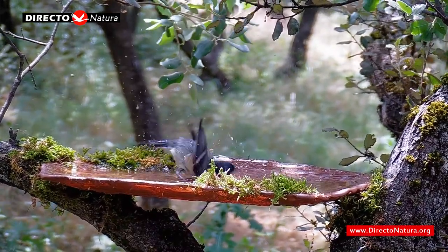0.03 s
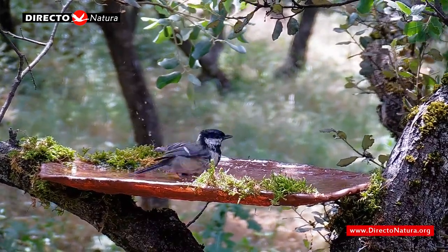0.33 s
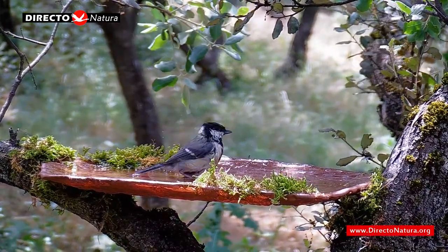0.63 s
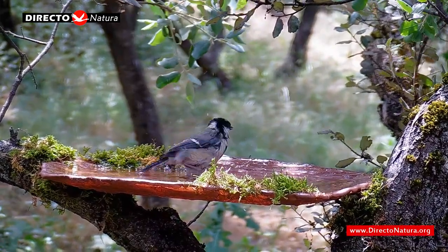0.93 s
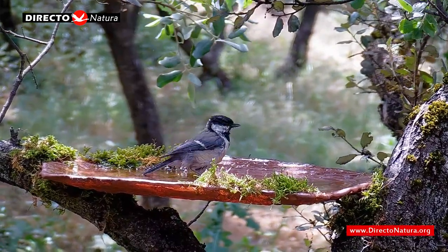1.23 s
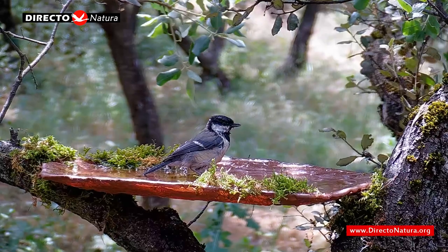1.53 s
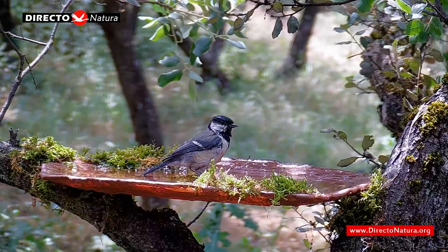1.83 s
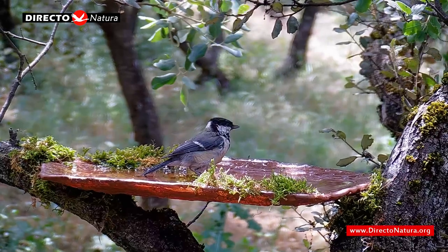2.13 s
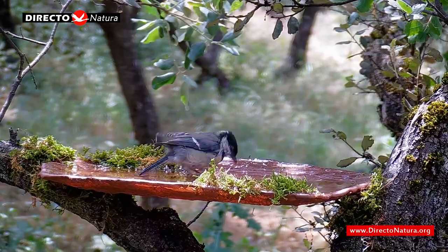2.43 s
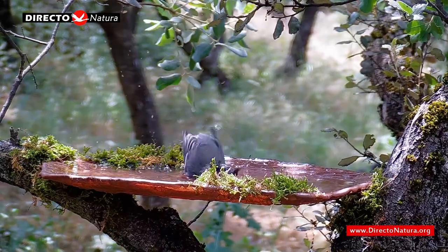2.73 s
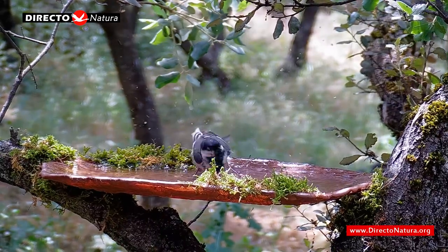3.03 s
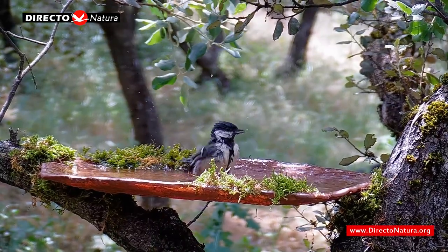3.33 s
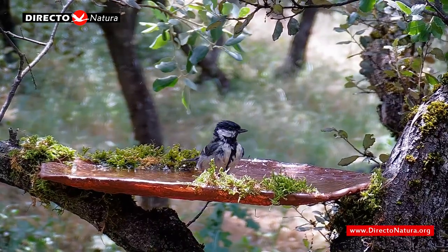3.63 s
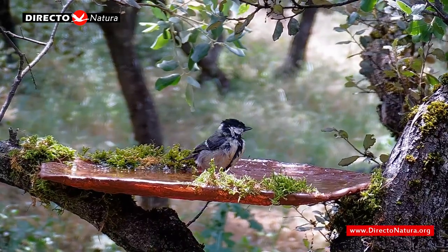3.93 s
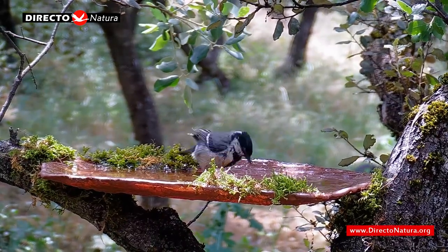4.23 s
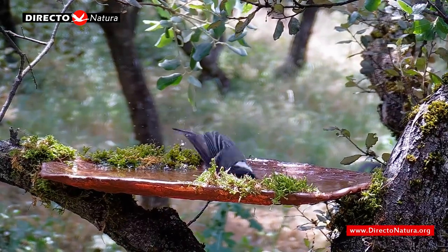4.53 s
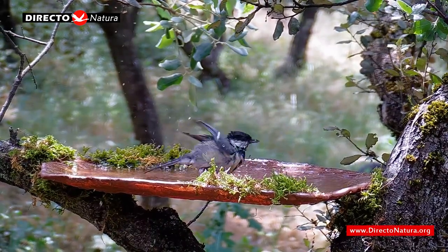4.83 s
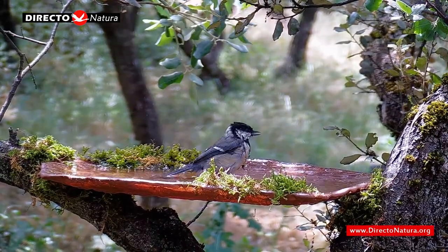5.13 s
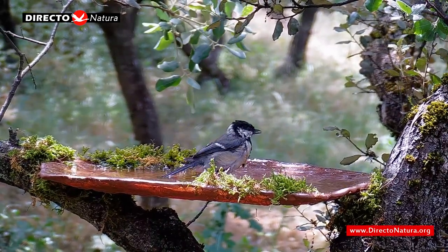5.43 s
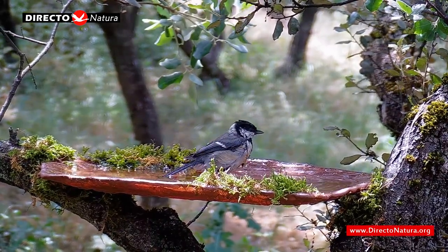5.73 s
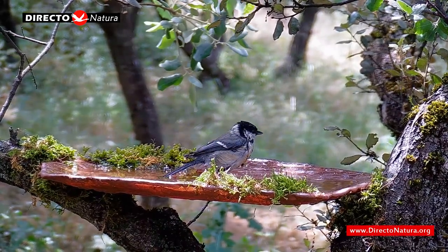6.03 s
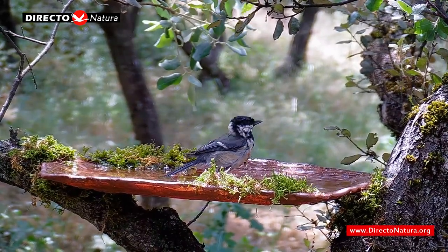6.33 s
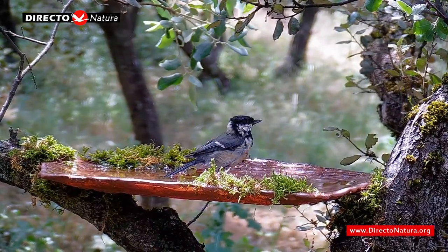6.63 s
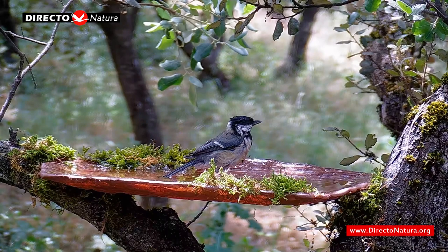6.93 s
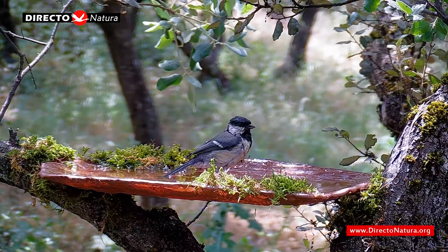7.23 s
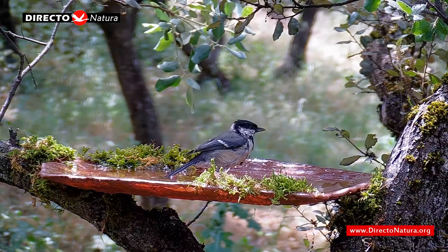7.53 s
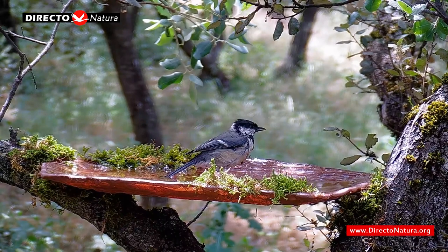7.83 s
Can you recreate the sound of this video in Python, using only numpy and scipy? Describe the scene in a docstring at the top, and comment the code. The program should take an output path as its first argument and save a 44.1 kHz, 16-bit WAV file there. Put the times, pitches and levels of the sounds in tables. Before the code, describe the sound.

A small bird splashes lightly in a shallow dish while high, thin bird calls sound in woodland over a low breeze rumble.

```python
"""Droplets patter and air thumps softly as a small bird bathes in a wood; its shallow dish is tapped
and rings, and bubbles chirp. A farther bird twitters, and tits call close by: a quavering trill, falling
whistles and, near the end, two sharp rising notes, each a nearly pure tone from the syrinx.
Trunks and leaves scatter the calls over a low breeze rumble, a faint mains hum and a soft hiss."""
import sys
import numpy as np
from scipy import signal
from scipy.fft import rfft, irfft, next_fast_len
from scipy.io import wavfile
from scipy.ndimage import uniform_filter1d, map_coordinates

SR = 44100
rng = np.random.default_rng(int(sys.argv[2]) if len(sys.argv) > 2 else 0)


def store_pcm(level_fs):
    """Save levels as 16-bit WAV."""
    pcm = np.round(np.clip(level_fs, -1, 1) * 32767).astype(np.int16)
    wavfile.write(sys.argv[1], SR, np.atleast_2d(pcm).T)


N = 352800  # 8 s


def amp(db):
    """Decibels to linear gain."""
    return 10 ** (np.asarray(db) / 20)


def clock(length_s):
    """Sample times in seconds."""
    return np.arange(max(int(length_s * SR), 8)) / SR


def add(track, start_s, sound):
    """Mix a sound into the track."""
    start = int(np.clip(round(start_s * SR), 0, N))
    track[start:start + len(sound)] += sound[:N - start]


def wobble(rate, size=N):
    """A smooth random curve, rate knots a second."""
    knots = rng.standard_normal(int(N * rate / SR) + 4)
    return map_coordinates(knots, [np.arange(size) * rate / SR])


def colour(sound, spectrum):
    """EQ a sound through (frequency_hz, gain_db) points."""
    size = next_fast_len(N + 8192)
    hz, db = np.transpose(spectrum)
    gain = amp(np.interp(np.log(np.fft.rfftfreq(size, 1 / SR) + 1), np.log(hz), db))
    return irfft(rfft(sound, size) * gain, size)[:N]


def noise(spectrum):
    """Coloured noise of rms 1."""
    shaped = colour(rng.standard_normal(N), spectrum)
    return shaped / np.sqrt(np.mean(shaped ** 2) + 1e-20)


def phase_of(hz):
    """Running phase of a gliding pitch."""
    return 2 * np.pi * np.cumsum(hz) / SR


def edges(t, fade_s):
    """A soft start and stop."""
    return np.sin(np.pi / 2 * np.clip(np.minimum(t, t[-1] - t) / fade_s, 0, 1)) ** 2


def bell_curve(peak_s, length_s):
    """A smooth rise and fall around a moment."""
    return np.exp(-(2 * (np.arange(N) / SR - peak_s) / length_s) ** 2)


def woodland(sound, near_db, near_t60, far_db, far_t60):
    """Each spot has its own echoes: a few close branches, then a diffuse tail from the trees."""
    t = np.arange(SR // 2) / SR
    branches = rng.standard_normal(len(t)) * (rng.random(len(t)) < .02)
    branches = branches * amp(-60 * t / near_t60) * (t > .002)
    trees = rng.standard_normal(len(t)) * amp(-60 * t / far_t60) * (1 - np.exp(-t / .012))
    echo = amp(near_db) * branches / np.linalg.norm(branches)
    echo += amp(far_db) * trees / np.linalg.norm(trees)
    echo[0] = 1  # direct sound
    return signal.fftconvolve(sound, echo)


def hiss_and_hum(hiss_db=-60.2):
    """The bed: the soft hiss of the wood and a slightly unsteady electrical hum."""
    # Mains hum and faint whine: pitch_hz, level_db
    partials = [(49.8, -52), (150.2, -58.5), (250, -73), (350, -76.5), (1416, -80), (1739, -82),
                (1846, -84.5), (2175, -77), (2283, -82), (2719, -80.5), (3079, -85.5), (5927, -84.5)]
    # Tone of the woodland air: frequency_hz, gain_db
    air_spectrum = [(59, -35), (100, -20.5), (156, -6.5), (181, -13.5), (233, -12.5), (388, -15),
                    (479, -18.5), (985, -21), (1500, -25.5), (2250, -27), (2500, -27.5), (2780, -26),
                    (4250, -34.5), (7060, -36), (15800, -46.5)]
    t, hum = np.arange(N) / SR, np.zeros(N)
    for hz, db in partials:
        hum += np.sqrt(2) * amp(db + wobble(3)) * np.sin(2 * np.pi * hz * t + .3 * wobble(1.996))
    return hum + amp(hiss_db + .54 * wobble(2)) * noise(air_spectrum)


def buffeting(rumble_waver_db=1.5, flutter_waver_db=1.6, waver_per_s=11):
    """Moving air rumbles and flutters on the microphone: a wavering breeze with soft puffs on top."""
    # The light breeze: time_s, rumble_db, flutter_db
    breeze = [(0, -47.5, -54), (1.75, -47, -51), (2.15, -50, -61), (2.75, -45.5, -50), (3.35, -48.5, -56),
              (4.7, -50, -55), (5.25, -54, -62), (5.6, -48, -60), (6.5, -53.5, -64), (7.3, -49, -58),
              (8, -51, -60)]
    # Puffs of air: peak_s, length_s, rumble_db, flutter_db
    puffs = [(0.088, 0.1, -33, -43), (.31, 0.038, -40, -48), (0.687, .13, -47, -45), (0.988, .06, -47, -42),
             (1.39, .14, -40, -43.5), (2.41, .04, -39, -56), (2.602, .05, -40, -51),
             (3.124, 0.092, -33.5, -41), (3.952, 0.074, -36.5, -54), (4.421, .055, -38, -37),
             (4.44, .18, -36.5, -51), (4.93, 0.037, -42, -52)]
    # The air's deep rumble: frequency_hz, gain_db
    rumble_spectrum = [(8, -10), (20, -3.5), (38, 0), (55, -4), (80, -22), (160, -55), (400, -100)]
    # The flutter above it: frequency_hz, gain_db
    flutter_spectrum = [(35, -31.5), (65, 3.5), (100, -3.5), (150, -8), (250, -18.5), (500, -28.5),
                        (1500, -51), (4000, -100)]
    t = np.arange(N) / SR
    time_s, rumble_db, flutter_db = np.transpose(breeze)
    rumble_power = amp(np.interp(t, time_s, rumble_db) + rumble_waver_db * wobble(waver_per_s)) ** 2
    flutter_power = amp(np.interp(t, time_s, flutter_db) + flutter_waver_db * wobble(waver_per_s)) ** 2
    for peak_s, length_s, puff_rumble_db, puff_flutter_db in puffs:
        puff = bell_curve(peak_s, length_s)
        rumble_power += amp(puff_rumble_db) ** 2 * puff
        flutter_power += amp(puff_flutter_db) ** 2 * puff
    rumble = np.sqrt(rumble_power) * noise(rumble_spectrum)
    flutter = np.sqrt(flutter_power) * noise(flutter_spectrum)
    return rumble + flutter


def droplets(starts_s, levels_db, centre_hz=6800, cycles=1.96):
    """Each droplet is a tiny ping of a few cycles, with its own pitch and size."""
    # Tone of the spray: frequency_hz, gain_db
    spray_spectrum = [(500, -20), (1500, 0), (3000, -1), (6000, -7), (10000, 2.5), (13000, -6), (16000, -5)]
    out, t = np.zeros(N), clock(.012)
    for start_s, db, (pitch, size) in zip(starts_s, levels_db, rng.standard_normal((len(starts_s), 2))):
        hz = np.clip(centre_hz * np.exp(.55 * pitch), 1400, 15500)
        ping = np.exp(-t * hz / cycles) * np.sin(2 * np.pi * hz * t)
        add(out, start_s, amp(db + 4.5 * np.tanh(size)) * ping)
    return colour(out, spray_spectrum)


def splashing(spatter_gain_db=5, spread_s=.006, drops_per_flick=36, patter_db=-60.5, plip_db=-63):
    """Each flick lands a clump of droplets; shaking wings add a thin patter and lower, wetter plips."""
    # Flicks of flung water: start_s, base_level_db
    flicks = [(.01, -55), (.105, -46), (.322, -54.5), (2.309, -63), (2.683, -57), (2.751, -55),
              (2.825, -61), (2.855, -61), (2.903, -58), (2.971, -57.5), (3.267, -57.5), (3.734, -60),
              (4.436, -59), (4.571, -56), (4.712, -59), (5.109, -60)]
    # Spells of wing shaking: start_s, end_s
    shakes = [(0, .2), (2.5, 3.05), (4.35, 4.85)]
    flick_s, flick_db = np.transpose(flicks)
    lag = rng.exponential(1, (len(flicks), drops_per_flick))
    landing_s = flick_s[:, None] + spread_s * lag
    landing_db = flick_db[:, None] + spatter_gain_db - 3 * lag  # late drops land softer
    spatters = droplets(landing_s.ravel(), landing_db.ravel())
    patter_s = np.concatenate([rng.uniform(start, end, size=240) for start, end in shakes])
    patter = droplets(patter_s, patter_db + 3 * rng.standard_normal(len(patter_s)))
    plip_s = np.concatenate([rng.uniform(start, end, size=30) for start, end in shakes])
    plips = droplets(plip_s, plip_db + 3 * rng.standard_normal(len(plip_s)), centre_hz=2600, cycles=6)
    return spatters + patter + plips


def bubbles(jitter_hz=70, fade_db=14):
    """Small air pockets ring and glide in pitch as they fade."""
    # Air pockets in the bath: start_s, length_s, first_hz, last_hz, level_db
    pockets = [(.007, 0.021, 2890, 2300, -59), (.39, .045, 961, 1940, -47.5),
               (3.327, .011, 2410, 2820, -45.5), (7.885, .016, 858, 930, -47.5),
               (7.915, 0.042, 948, 1080, -55)]
    out = np.zeros(N)
    for start_s, length_s, first_hz, last_hz, db in pockets:
        t = clock(length_s)
        glide_hz = first_hz + (last_hz - first_hz) * (t / length_s) ** 1.6
        tone = np.sin(phase_of(glide_hz + jitter_hz * wobble(500, size=len(t))))
        ring = np.sqrt(2) * amp(db - fade_db * t / length_s) * edges(t, .003) * tone
        add(out, start_s, woodland(ring, near_db=-12, near_t60=.1, far_db=-17, far_t60=.3))
    return out


def whistle(t, hz, db, quaver_hz, quaver_per_s, jitter_hz, base_octave_db):
    """The syrinx: a nearly pure tone with a fast quaver; its octave grows with effort and steep glides."""
    glide_hz = uniform_filter1d(hz, size=130)
    quaver = np.sin(phase_of(quaver_per_s * (1 + .25 * wobble(90, size=len(t)))))
    phase = phase_of(glide_hz + quaver_hz * quaver + jitter_hz * wobble(300, size=len(t)))
    pressure = amp(db + 1.4 * wobble(130.6, size=len(t))) * edges(t, .0033)
    steepness = np.clip(np.abs(np.gradient(glide_hz)) * SR / 400000, 0, 1)
    octave = amp(base_octave_db + .35 * (db + 29.5) + 20 * steepness)
    return np.sqrt(2) * pressure * (np.sin(phase) + octave * np.sin(2 * phase))


def note(shape, length_s, hz, db, quaver_hz, rasp_hz=90, rasp_decay_s=.014):
    """One bird note: a contour stretched to its length and pitch, opening with a brief rasp."""
    # Note contours by name: share_of_length, pitch_ratio, gain_db
    contours = { "tew": [(0, 1.16, -26), (.07, 1.05, -13), (.15, 1.0, -1), (.26, .994, 0),
                (.42, 1.01, -6.5), (.65, 1.022, -5.5), (.88, 1.028, -8.5), (1, 1.02, -9)],
                "tsee": [(0, 0.3, -15.5), (.04, .42, -12), (.068, .72, -7), (.105, .94, -2.5),
                (.16, 1.02, -1), (.4, 1.0, -1.5), (.65, .992, 1), (.85, .976, -1), (1, .964, -1)],
                "tsii": [(0, 0.38, -26), (.04, 0.69, -13.5), (.09, .95, -3), (.16, 1.027, 0),
                (.3, 1.004, 0), (.45, .997, -2.5), (.7, .986, 3), (.9, .978, 1), (1, .974, -4)],
                "sip": [(0, 1.012, -15), (.25, 1.005, -2.5), (.6, 1.0, -2.5), (1, 1, -4.5)],
                "rise": [(0, .87, -12), (.4, .9, -5), (.62, .97, -0.5), (.82, 1.0, 2), (1, 1.005, 6)],
                "fall": [(0, 1.1, -7), (.25, 1.04, -1.5), (.6, .975, -3), (1, .88, -9)],
                "slur": [(0, 1.04, -5), (.25, 1.02, 0.5), (.6, .985, -3), (1, .955, -12)],
                "lisp": [(0, .98, -11), (.25, .99, 2.5), (.6, 1.02, -10), (1, 1, -5)],
                "seee": [(0, 1.04, -5), (.08, 1.042, 2), (.25, 1.012, -6), (.5, 1.0, 1), (.8, .985, -1.5),
                (.94, .975, 2), (1, .94, -16)], }
    t = clock(length_s)
    share, ratio, gain_db = np.transpose(contours[shape])
    pitch_hz = hz * np.interp(t / length_s, share, ratio)
    level_db = db + np.interp(t / length_s, share, gain_db)
    rasp = rasp_hz * np.exp(-t / rasp_decay_s)
    return whistle(t, pitch_hz, level_db, quaver_hz + rasp, quaver_per_s=235,
                   jitter_hz=18 + rasp, base_octave_db=-32.5)


def far_twitter():
    """A farther bird, blurred by the trees: each run steps evenly in time, pitch and level."""
    # Runs of like notes: shape, first_s, last_s, count, length_s, first_hz, last_hz, first_db, last_db
    runs = [ ("fall", .195, .522, 4, 0.0228, 4150, 3720, -69, -62),
            ("rise", .09, .09, 1, .045, 4750, 4750, -62, -62),
            ("fall", .226, .548, 4, .027, 4650, 4380, -66, -63),
            ("rise", 5.25, 5.425, 3, .042, 4650, 4620, -77, -63.5),
            ("rise", 5.525, 5.752, 3, .047, 4600, 4600, -58, -60.5),
            ("slur", 5.662, 6.036, 3, .06, 4140, 3880, -51, -63),
            ("rise", 7.1, 7.86, 2, 0.0226, 4750, 4300, -64, -66),
            ("fall", 7.75, 7.914, 2, .024, 4350, 4250, -66, -63.5), ]
    out = np.zeros(N)
    for shape, first_s, last_s, count, length_s, first_hz, last_hz, first_db, last_db in runs:
        steps = np.linspace((first_s, first_hz, first_db), (last_s, last_hz, last_db), count)
        for start_s, hz, db in steps:
            chirp = note(shape, length_s, hz, db, quaver_hz=35)
            add(out, start_s, woodland(chirp, near_db=-8, near_t60=.11, far_db=-10, far_t60=.43))
    return out


def dish_taps(tick_t60=.03, ring_attack_s=.0014):
    """Light blows tick and ring the dish; the spot struck sets each mode's share."""
    # Blows on the dish: start_s, low_mode_db, middle_mode_db, top_mode_db, tick_db
    blows = [(.107, -43.5, -62, -66, -50), (2.501, -38.5, -48, -38, -46), (2.568, -48, -62, -51, -47.5),
             (4.307, -51, -48, -51, -56), (4.364, -50.5, -46, -58, -46.5)]
    # The dish's modes: pitch_hz, t60_s
    modes = [(1165, .15), (1906, .06), (2404, 0.11)]
    out, t = np.zeros(N), clock(.25)
    for start_s, *mode_db, tick_db in blows:
        ring = sum(amp(db - 60 * t / t60) * np.sin(2 * np.pi * hz * t)
                   for db, (hz, t60) in zip(mode_db, modes))
        dull_noise = signal.lfilter([.3], [1, -.7], rng.standard_normal(len(t)))
        tick = amp(tick_db - 60 * t / tick_t60) * dull_noise
        add(out, start_s, ring * (1 - np.exp(-t / ring_attack_s)) + tick)
    return out


def trill(start_s=.498, length_s=.296, hz=7160, db=-41.6):
    """A swelling note whose warble quickens and narrows; the two sides of the syrinx beat together."""
    sag_hz_per_s, droop_hz, swell_db_per_s = 200, 240, 24
    attack_s, release_s, edge_db = .045, .02, 10.5
    warble_hz, warble_db, narrowing_s = 310, 1.8, .14
    split_hz, second_side_db, join_s = 130, -6, .16
    t, out = clock(length_s), np.zeros(N)
    warble_per_s = np.interp(t, [0, .125], [14, 33.5])
    warble = -np.cos(phase_of(warble_per_s)) * (1 + .3 * wobble(33.5, size=len(t)))
    starting = np.clip(1 - t / attack_s, 0, 1)
    ending = np.clip(1 - (t[-1] - t) / release_s, 0, 1)
    pitch_hz = hz - sag_hz_per_s * t - droop_hz * ending
    pitch_hz += warble_hz * np.exp(-t / narrowing_s) * warble
    level_db = db + swell_db_per_s * t + warble_db * warble - edge_db * (starting + ending)
    voice = dict(quaver_hz=35, quaver_per_s=190, jitter_hz=40, base_octave_db=-34.5)
    first_side = whistle(t, pitch_hz + split_hz / 2, level_db, **voice)
    second_side = whistle(t, pitch_hz - split_hz / 2, level_db, **voice)
    tone = first_side + amp(second_side_db) * np.minimum(t / join_s, 1) * second_side
    add(out, start_s, woodland(tone, near_db=-5.5, near_t60=.08, far_db=-16, far_t60=.3))
    return out


def tit_calls():
    """Close tits: mostly direct sound and a short tail, wetter and longer from the farther perches."""
    # The tits' notes: shape, start_s, length_s, pitch_hz, level_db, quaver_depth_hz, extra_echo_db
    calls = [ ("sip", .735, .08, 5100, -67, 10, 7), ("tew", .795, .11, 5600, -51, 10.2, 9),
             ("tew", 1.092, 0.11, 5480, -61, 20, 7), ("lisp", 1.19, 0.058, 8650, -70, 30, 7),
             ("tew", 1.486, .11, 5420, -52, 20, 6), ("lisp", 1.55, .05, 5580, -57.5, 60, 6),
             ("lisp", 4.125, 0.054, 7430, -59, 60, 7), ("sip", 4.488, 0.019, 7080, -44.5, 0, -1),
             ("seee", 4.815, .24, 7870, -58.5, 150, 7), ("sip", 5.535, 0.022, 6830, -37.5, 0, -1),
             ("lisp", 6.04, .07, 8800, -73, 130, 7), ("lisp", 6.195, .06, 6400, -69, 150, 7),
             ("tew", 6.691, 0.084, 5394, -38, 5, 2), ("tsii", 6.79, .089, 8010, -29.7, 14, 0),
             ("tsee", 7.042, .11, 7815, -27.5, 14, -1.5), ("rise", 7.088, .028, 3400, -61, 140, 7),
             ("sip", 7.135, .1, 5110, -71, 5, 1), ("tew", 7.312, 0.1, 5392, -32.5, 5, 1),
             ("tew", 7.657, .107, 5385, -36, 5, 5), ("tew", 7.978, .1, 5320, -30.5, 5, 2), ]
    out = np.zeros(N)
    for shape, start_s, length_s, hz, db, quaver_hz, echo_db in calls:
        call = note(shape, length_s, hz, db, quaver_hz)
        add(out, start_s, woodland(call, near_db=-11 + echo_db, near_t60=.075,
                                   far_db=-19 + echo_db, far_t60=.28 + .015 * echo_db))
    return out


def far_swells():
    """The wood's distant noise rises and falls softly, twice."""
    # Swells of distant noise: peak_s, length_s, level_db
    swells = [(5.8, .55, -63), (7.92, .45, -61.5)]
    # Their dull tone: frequency_hz, gain_db
    swell_spectrum = [(100, -20), (200, 0), (500, -6), (1000, -11), (2500, -19), (6000, -40)]
    power = sum(amp(db) ** 2 * bell_curve(peak_s, length_s) for peak_s, length_s, db in swells)
    return np.sqrt(power) * noise(swell_spectrum)


def scene():
    """Birds, bath, breeze and wood in one mono mix."""
    birds = tit_calls() + trill() + far_twitter()
    bath = dish_taps() + bubbles() + splashing()
    return (birds + bath + buffeting() + far_swells() + hiss_and_hum())[None]


def record(dry):
    """A brick-wall low-pass trims the very top of the mix."""
    cutoff_hz = 15850
    size = next_fast_len(N + 8192)
    passband = np.fft.rfftfreq(size, 1 / SR) < cutoff_hz
    return irfft(rfft(dry, size) * passband, size)[:, :N]


dry = scene()
out = record(dry)
store_pcm(out)
```